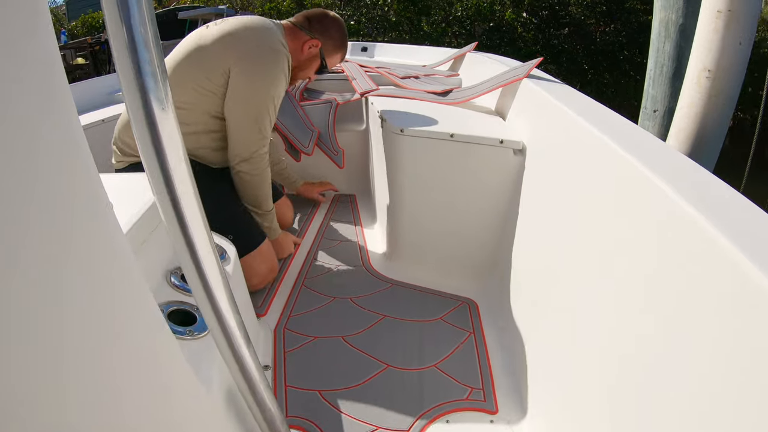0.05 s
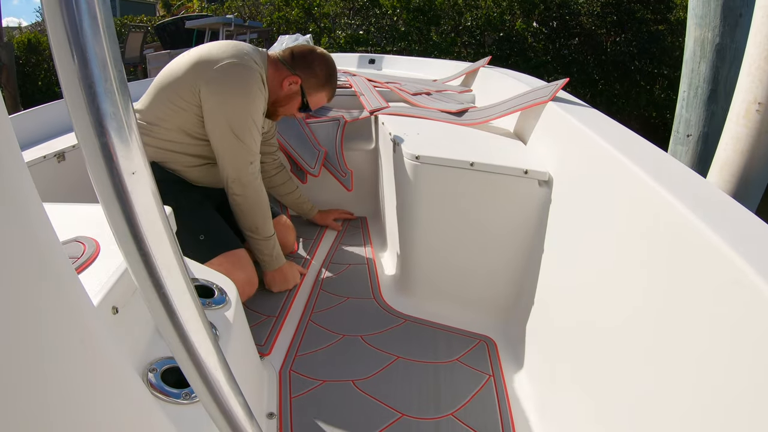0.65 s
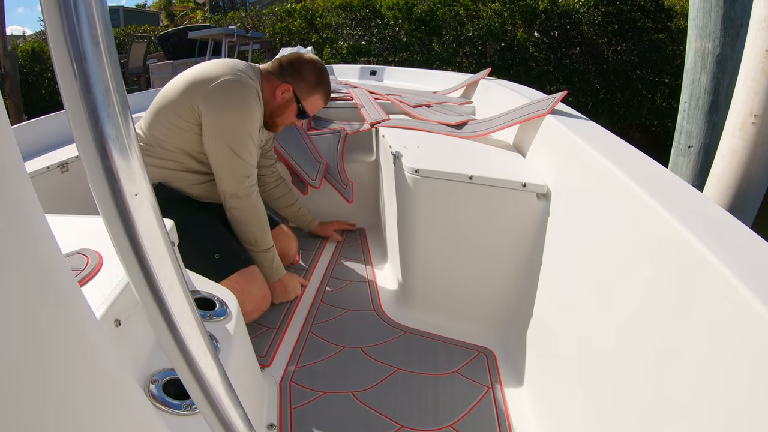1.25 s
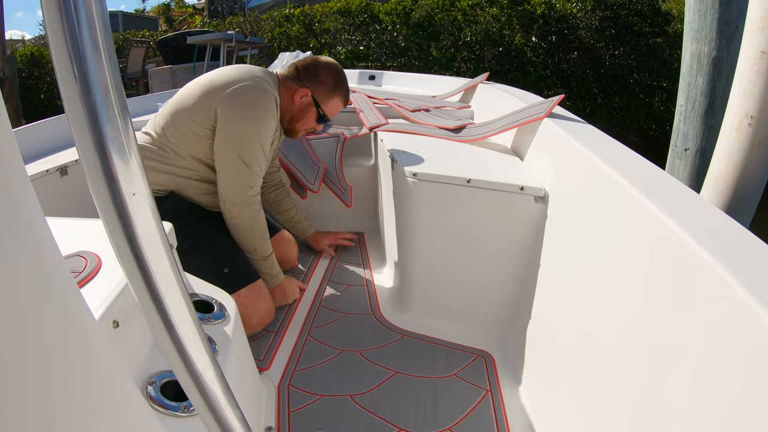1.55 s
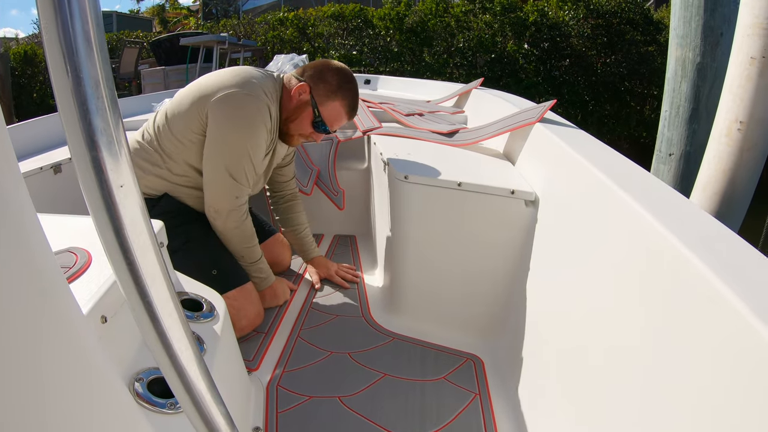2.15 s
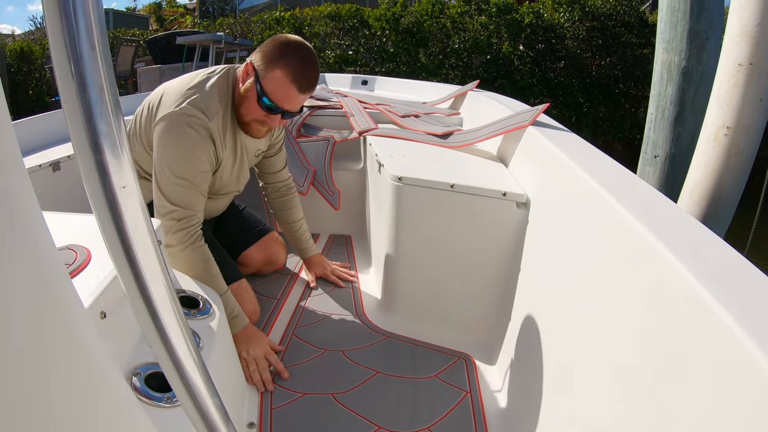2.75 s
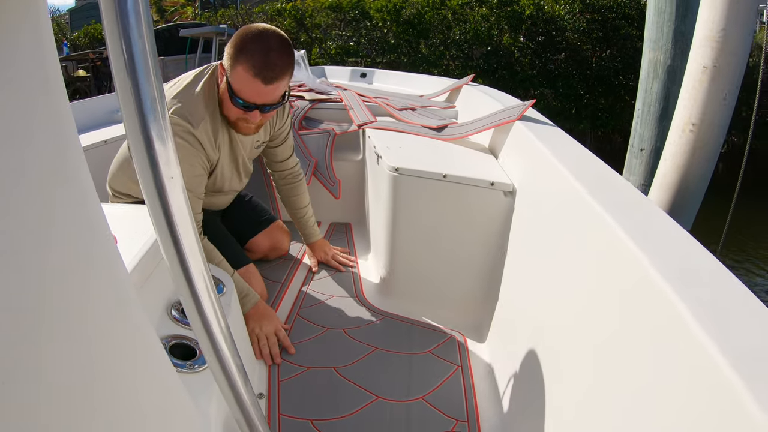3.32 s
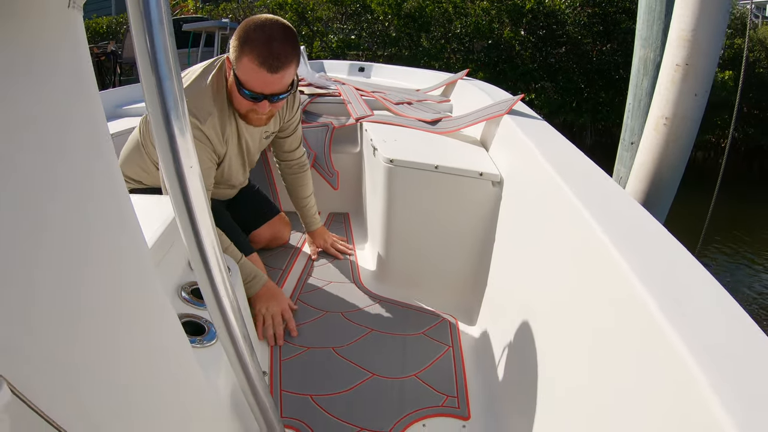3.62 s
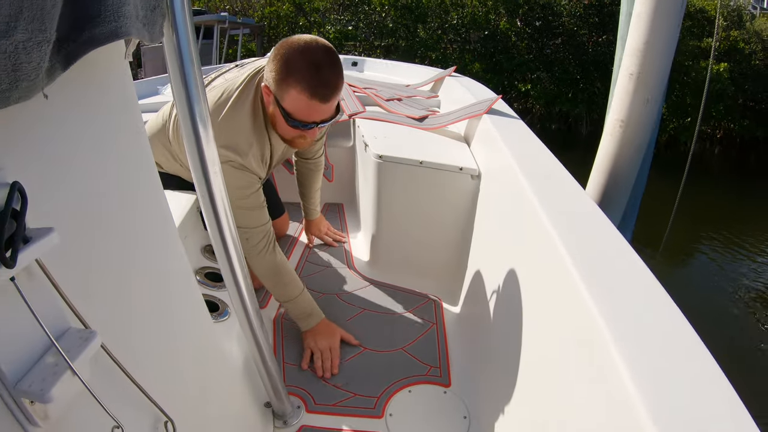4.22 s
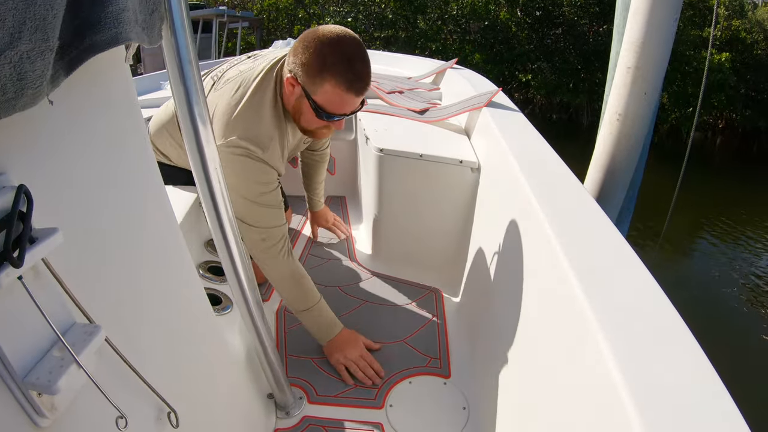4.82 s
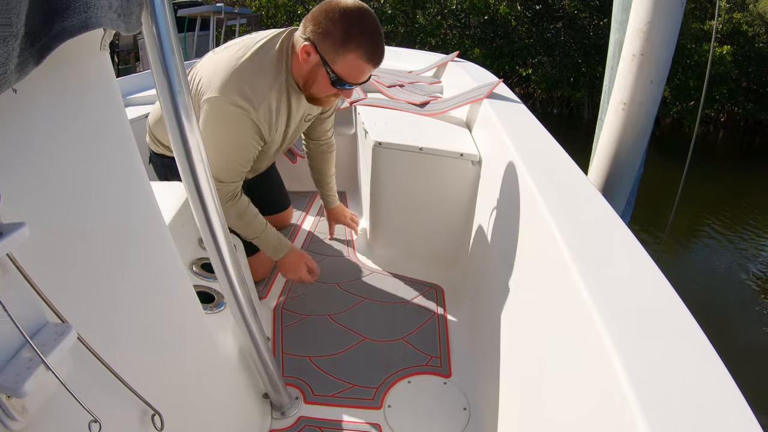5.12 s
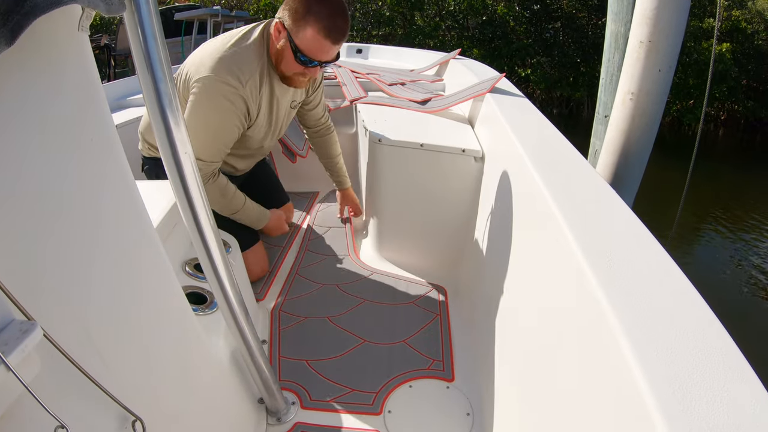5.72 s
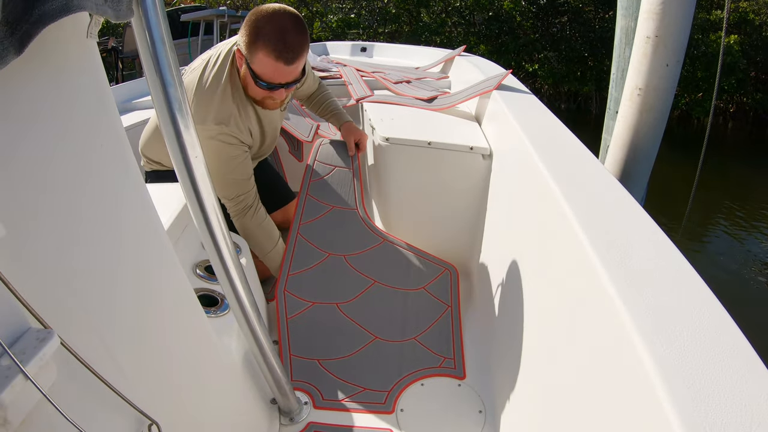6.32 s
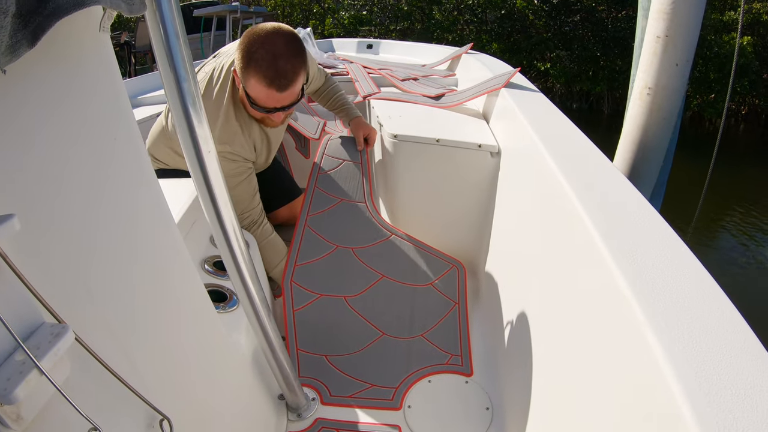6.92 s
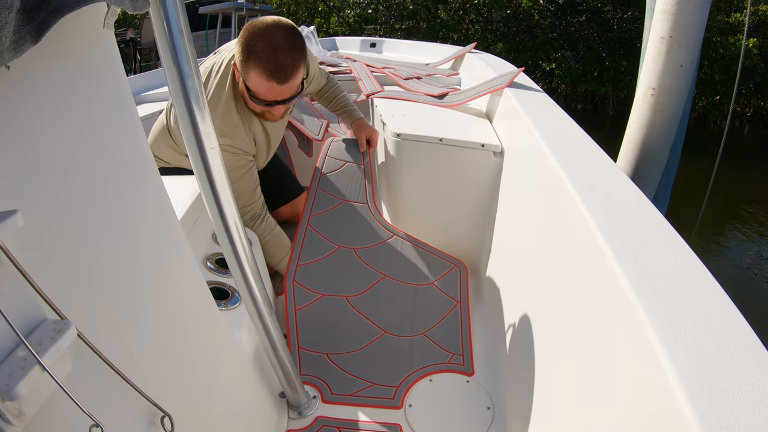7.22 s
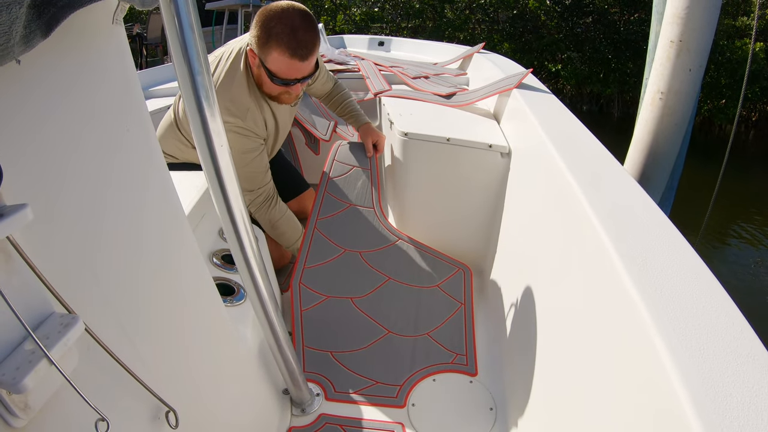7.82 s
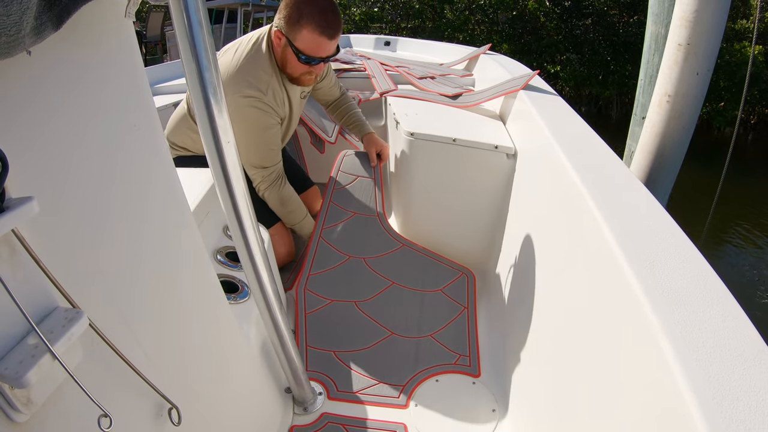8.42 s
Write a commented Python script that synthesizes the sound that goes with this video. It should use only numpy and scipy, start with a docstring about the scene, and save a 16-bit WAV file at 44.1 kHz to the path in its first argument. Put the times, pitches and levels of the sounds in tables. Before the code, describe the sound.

Outdoors in a boat's cockpit, knees and hands knock on a hollow deck and sleeves brush a foam mat. Hands rub the foam in two raspy strokes. Then the mat scrapes along in shoves, its backing paper crackling with a sharp cluster of snaps before a steady papery slide. Low rumble and soft thuds come from the hand-held microphone, with a faint outdoor wash and hum behind.

```python
"""Soft bumps, knocks and light brushing, then palms hissing and rasping over a foam deck pad on a moored boat.
The pad is shoved and slid: its edge scrapes, its stiff paper backing hisses, folds and snaps.
Rubbing is a stream of tiny slips; a snap is a burst of creases that rings the pad and the hollow deck.
Knees and hands knock on the deck, and all the work echoes in the hard-walled cockpit.
A hand-held camera adds the bumps and a low rumble, over open air and a faint hum."""
import sys
import numpy as np
from scipy import signal
from scipy.fft import rfft, irfft
from scipy.io import wavfile
from scipy.ndimage import uniform_filter1d

SR = 44100
rng = np.random.default_rng(int(sys.argv[2]) if len(sys.argv) > 2 else 0)


def digitize_waveform(pressure):
    """Quantize a signal to 16-bit integers and store it at the path in sys.argv[1].

    Rows of a 2-D input are taken as channels; values are limited to [-1, 1].
    """
    field = np.atleast_2d(pressure).T
    bounded = np.clip(field, -1, 1)
    quanta = np.round(bounded * 32767).astype(np.int16)
    wavfile.write(sys.argv[1], SR, quanta)


N = 381906

# palm sweeps: start_s, length_s, skin_db, grit_db
PALM_SWEEPS = [(3.869, 0.7618, -48, -52), (4.836, 0.298, -53.3, -60.5)]
# palm bearing down: centre_s, half_width_s, relative_force
PALM_PUSHES = [(4.07, 0.057, 0.4), (4.365, 0.125, 1), (5.08, 0.055, 1.3)]
# skin hiss: freq_hz, density_db
SKIN_SPECTRUM = [(400, -20), (3500, -14), (5000, -10), (6500, -1.5), (8000, -2.5), (9500, -1.5),
                 (12000, -5), (15800, -9)]
# grit of pressed foam: freq_hz, density_db
GRIT_SPECTRUM = [(300, -17), (600, -6), (850, 2.5), (1300, -2), (2700, 0), (3400, 1), (4600, -1.5),
                 (5700, -1), (8000, -8), (12000, -15), (15800, -22)]
# rasping strokes, one curve each: time_s, centre_hz, level_db
RASP_STROKES = [
    [(3.87, 1700, -68), (3.905, 1700, -58), (3.97, 1200, -64), (4.05, 980, -52.5), (4.19, 1800, -61),
     (4.29, 1600, -47), (4.38, 2000, -44), (4.49, 1600, -53), (4.63, 1200, -52), (4.69, 1000, -70)],
    [(4.84, 850, -67), (4.92, 930, -53.5), (5.005, 1250, -55), (5.045, 1850, -45.5), (5.095, 2300, -47),
     (5.13, 3700, -53), (5.155, 4200, -68)],
    [(8.46, 1200, -64), (8.55, 1300, -50.5), (8.66, 1400, -49.5)],
]
# rasp resonance: ratio_to_centre, gain_db
RASP_RESONANCE = [(.15, -40), (.42, -20), (.7, -3), (1, 0), (1.3, -2.5), (1.9, -15), (4, -32), (10, -50)]
# foam groans and squeaks: start_s, length_s, pitch_hz, level_db
FOAM_GROANS = [(3.885, 0.126, 114.7, -48), (5.077, 0.027, 265, -53), (6.465, 0.0436, 105, -54.5),
               (8.136, 0.1, 432, -55), (0.963, 0.04, 5360, -59), (5.08, 0.075, 1560, -53)]
# sleeve and finger touches: peak_s, level_db, fade_s
TOUCHES = [(0.054, -57.5, 0.11), (0.212, -53.5, 0.0477), (0.43, -60.5, 0.114), (0.755, -62.5, 0.049),
           (0.985, -51.5, 0.0164), (1.16, -63, 0.067), (1.53, -58.5, 0.068), (2.128, -55, 0.0108),
           (2.53, -53, 0.183), (3.777, -51, 0.044), (5.35, -58.5, 0.065), (5.804, -59, 0.0253)]
# light brushing: freq_hz, density_db
BRUSH_SPECTRUM = [(500, -5.5), (2000, 1), (4000, 0), (6200, 1), (9500, -2), (12500, -9), (15800, -13.5)]

# shoves of the pad: start_s, length_s, paper_db, scrape_db, bass_db
PAD_SHOVES = [(5.3, 0.11, -73.5, -80, -56), (5.66, 0.083, -60.5, -57.5, -59),
              (5.9, 0.336, -61, -76.5, -67.5), (6.245, 0.1, -67, -48.5, -52),
              (6.32, 0.1983, -56.5, -54, -57), (6.44, 0.09, -70, -53.5, -60), (6.53, 0.192, -57, -71, -59),
              (6.65, 0.246, -60, -57.5, -57.5), (6.9, 0.157, -72, -54.5, -64),
              (7.13, 0.11, -60, -68.5, -57)]
# long slide of the backing: time_s, level_db
SLIDE_LEVELS = [(7.05, -64), (7.15, -55.5), (7.4, -54), (7.62, -54.3), (8.04, -51), (8.28, -51.3),
                (8.53, -53), (8.66, -50.5)]
# hollow colour of the sliding backing: ratio_to_ridge, gain_db
SLIDE_RIPPLE = [(.44, 0), (.51, -2), (.59, 1.5), (.64, -.5), (.7, 1.5), (.77, -1.5), (.92, -1), (1, 3),
                (1.05, -1.5), (1.1, 1.5), (1.2, -.5)]
# climb of its main ridge: time_s, ridge_hz
RIDGE_PATH = [(7.1, 8900), (7.85, 9400), (8.15, 10050), (8.66, 10550)]
# paper hiss: freq_hz, density_db
PAPER_SPECTRUM = [(150, -6), (400, -0.5), (600, -3), (900, -6), (1300, 0), (1850, 1.5), (2700, 1.5),
                  (4300, -0.5), (6200, -0.5), (7500, -4.5), (9200, -4.5), (12500, -11), (15800, -14)]
# edge scrape: freq_hz, density_db
SCRAPE_SPECTRUM = [(150, -7), (400, -8.5), (580, -3), (850, 2), (1400, 2), (2000, -3), (3500, -9.5),
                   (8000, -15), (15800, -35)]
# deck bass under the dragged pad: freq_hz, density_db
BASS_SPECTRUM = [(50, -12.5), (110, 6.5), (220, 8.5), (400, 1.5), (700, -1.5), (1500, -88), (5000, -90)]

# snaps of the backing: start_s, fold_db, low_hz, high_hz, rise_s, decay_s, crack_db
BACKING_SNAPS = [ (0.921, -36, 400, 1730, .0009, 0.00243, -62),
                 (1.0731, -38, 2400, 2300, 0.00075, 0.00405, -53.5),
                 (1.1414, -33.5, 2400, 2400, 0.00065, 0.0041, -44),
                 (3.104, -42, 700, 3600, 0.00048, 0.00232, -56),
                 (5.503, -41.5, 800, 5000, 0.003, 0.00334, -43.5),
                 (5.718, -39.5, 700, 1850, .006, 0.0174, -74),
                 (5.8977, -37, 300, 3480, 0.00043, 0.00164, -50),
                 (5.9655, -41, 700, 1000, 0.00073, 0.0051, -66),
                 (6.185, -43, 300, 1700, 0.0147, 0.0059, -51.5),
                 (6.341, -35, 250, 890, 0.0011, 0.0024, -66),
                 (6.598, -39.5, 600, 2200, 0.00157, 0.0032, -64),
                 (6.6655, -35, 1500, 5000, .002, 0.004, -37), (6.671, -25.5, 700, 2700, .002, 0.0035, -42),
                 (6.690, -29, 700, 2300, 0.0059, 0.0084, -62),
                 (6.7552, -20, 553, 3840, 0.00137, 0.00766, -12),
                 (6.808, -26.5, 450, 3560, 0.0088, 0.0055, -22.5),
                 (6.835, -35, 450, 2580, 0.0013, 0.012, -62), (6.863, -43, 2000, 3600, 0.001, 0.004, -60),
                 (6.921, -35.5, 398, 5600, 0.0009, 0.0081, -42),
                 (6.996, -32, 700, 2200, 0.00168, 0.0078, -60), (7.006, -28, 1200, 2300, 0.002, 0.004, -60),
                 (7.038, -45, 2500, 5000, 0.002, 0.004, -62),
                 (7.199, -39.5, 450, 3930, 0.011, 0.008, -61.5),
                 (7.406, -39.5, 250, 3820, 0.0052, 0.0123, -48)]
# modes of the backed pad: freq_hz, lift_db, t60_s
PAD_MODES = [(343, 11.5, 0.048), (564, 3, 0.06), (695, -2, 0.06), (845, 6, 0.04), (1000, 2.5, 0.042),
             (1134, -4, 0.05), (1279, 0.5, 0.0194), (1810, 7.5, 0.036), (2270, 0, 0.046), (2800, 1, 0.0275),
             (3320, -2, 0.039), (3898, 4, 0.05), (4870, 3, 0.04), (5330, 1.5, 0.028), (5920, 8, 0.0112),
             (8850, 8, 0.0062)]
# knocks on the deck: start_s, peak_db, pitch_hz
DECK_KNOCKS = [(0.067, -25.5, 146), (0.92, -24, 142), (0.926, -33, 253.3), (5.623, -26.5, 342),
               (5.644, -29.5, 241.8), (5.969, -35, 330), (6.342, -33.5, 290), (6.76, -35, 344),
               (6.815, -39, 280), (7.002, -36, 311)]
# deck panel modes: ratio_to_pitch, level_db, t60_s
DECK_MODES = [(.62, -4, 0.0378), (1, 4.5, 0.0274), (1.45, -5.5, 0.068), (1.9, -11, 0.074),
              (2.5, -19.5, 0.115)]
# cockpit echo decay: freq_hz, t60_s
COCKPIT_DECAY = [(150, 0.369), (700, 0.142), (2000, 0.114), (5000, 0.0887), (15000, 0.093)]

# bumps on the camera: start_s, level_db
CAMERA_BUMPS = [(0.05, -37), (0.068, -30), (0.206, -33), (0.246, -36.5), (0.424, -34.5), (0.876, -38),
                (3.093, -29.5), (3.184, -45), (3.401, -32.5), (3.574, -39), (3.815, -32), (4.024, -32.5),
                (4.066, -35.5), (4.191, -32.5), (4.50, -33.5), (4.545, -27.5), (4.579, -34.5), (4.617, -31),
                (4.857, -40), (5.149, -32.5), (5.508, -30)]
# camera moves: start_s, length_s, level_db
CAMERA_MOVES = [(0.0, 0.47, -37.5), (0.6, 0.292, -44), (1.25, 0.133, -46.5), (3.05, 0.48, -39.5),
                (3.95, 0.338, -38.5), (4.42, 0.144, -34.5), (4.72, .8, -46), (5.65, 0.38, -45)]
# handling rumble: freq_hz, density_db
RUMBLE_SPECTRUM = [(2, 3), (5, 13.5), (11, 4.5), (17, 1.5), (24, -5.5), (33, -24.5), (50, -12.5),
                   (80, -25.5), (150, -44.5), (300, -43.5), (700, -69)]
# open air: freq_hz, density_db
AIR_SPECTRUM = [(20, -22.5), (40, -3.5), (70, 0.5), (100, -6), (150, -5), (200, -7.5), (310, -10),
                (450, -8.5), (580, -11.5), (800, -12), (1300, -13), (2500, -17), (4500, -24.5),
                (15800, -35)]
# mains hum: freq_hz, rms_db
MAINS_HUM = [(60, -66.5), (120, -72.5)]

SHOVE_ATTACK_S, SHOVE_RELEASE_S = 0.0222, 0.0313


def palm_sweeps(push_skin_db=3, push_grit_db=8):
    """The palm hisses over the foam grain, louder and grittier where it presses."""
    t = np.arange(N) / SR
    force = sum(strength * np.exp(-np.minimum(((t - s) / half_width_s) ** 2, 20))
                for s, half_width_s, strength in PALM_PUSHES)
    skin_gain, grit_gain = 0, 0
    for s, length_s, skin_db, grit_db in PALM_SWEEPS:
        touch = contact(t - s, length_s, attack_s=0.032, release_s=0.042 * length_s)
        skin_gain += touch * gain_of(skin_db + push_skin_db * force)
        grit_gain += touch * gain_of(grit_db + push_grit_db * force)
    fine = friction(slips_per_s=7700, spread_db=1, smooth=2.55, judder_db=0.6, judder_hz=45)
    coarse = friction(slips_per_s=2500, spread_db=2, smooth=0.8, judder_db=1, judder_hz=46)
    skin = skin_gain * coloured(fine, SKIN_SPECTRUM, (6000, 15000))
    grit = grit_gain * coloured(shifting(coarse, patch_db=2.6), GRIT_SPECTRUM, (700, 5000))
    return gain_of(-1) * skin + grit


def foam_rasp():
    """Rubbed foam rasps in a broad resonance that glides with the speed of the stroke."""
    slips = friction(slips_per_s=3000, spread_db=1.5, smooth=1, judder_db=0.8, judder_hz=50)
    slips = evened(shifting(slips, patch_db=3, patch_bins=4))
    path = [(s, hz) for stroke in RASP_STROKES for s, hz, _ in stroke]
    envelope = sum(level([(s, db) for s, _, db in stroke]) for stroke in RASP_STROKES)
    return envelope * gliding(slips, RASP_RESONANCE, path)


def paper_slide():
    """The backing hisses over the deck in short shoves and one long slide whose hollow colour rises."""
    motion = np.hypot(movements(PAD_SHOVES, SHOVE_ATTACK_S, SHOVE_RELEASE_S), level(SLIDE_LEVELS))
    slips = friction(slips_per_s=3500, spread_db=2.5, smooth=1.48, judder_db=0.65, judder_hz=25)
    hiss = gliding(slips, SLIDE_RIPPLE, RIDGE_PATH)
    return motion * coloured(hiss, PAPER_SPECTRUM, (4500, 15000))


def edge_drag():
    """The pad's edge scrapes in coarse slips; weight on it brings out the deck's bass."""
    shoves = movements(PAD_SHOVES, SHOVE_ATTACK_S, SHOVE_RELEASE_S, column=3)
    weight = movements(PAD_SHOVES, SHOVE_ATTACK_S, SHOVE_RELEASE_S, column=4)
    motion = np.hypot(shoves, gain_of(-10) * level(SLIDE_LEVELS))
    slips = friction(slips_per_s=2500, spread_db=2, smooth=1.88, judder_db=3.85, judder_hz=29.8)
    slips = shifting(slips, patch_db=0.73)
    scrape = motion * coloured(slips, SCRAPE_SPECTRUM, (400, 2000))
    bass = weight * coloured(slips, BASS_SPECTRUM, (80, 600))
    return gain_of(-1) * scrape + bass


def backing_snaps(lag_s=0.002, crack_rise_s=0.00107, crack_decay_s=0.00275, fizz_low_hz=9000):
    """The backing folds, then gives way with a fizz of paper fibres; the loudest crack is bright."""
    out, t = np.zeros(N), np.arange(SR // 20) / SR
    loudest_db = max(row[-1] for row in BACKING_SNAPS)
    fibres = contact(t, crack_rise_s, crack_rise_s, release_s=0.004)
    highpass = signal.butter(2, fizz_low_hz, "high", fs=SR)
    for s, fold_db, low_hz, high_hz, rise_s, decay_s, crack_db in BACKING_SNAPS:
        add(out, s, gain_of(fold_db) * buckle(low_hz, high_hz, rise_s, decay_s))
        weaker_db = loudest_db - crack_db
        top_hz = 4900 * 2 ** (-2.9 * weaker_db)  # weaker cracks shrink to a faint low thump
        fizz = signal.lfilter(*highpass, fibres * rng.standard_normal(len(t)))
        add(out, s + lag_s, gain_of(crack_db) * buckle(3800, top_hz, crack_rise_s, crack_decay_s))
        add(out, s + lag_s, gain_of(-36.5 - 0.58 * weaker_db) * fizz)
    return out


def buckle(low_hz, high_hz, rise_s, decay_s):
    """A filtered burst of creases rings the pad, bent a little differently each time, and the deck."""
    t = np.arange(SR // 6) / SR
    swell = contact(t, rise_s, rise_s, decay_s, max_decay=np.inf)
    burst = signal.lfilter(*signal.butter(1, low_hz, "high", fs=SR), flat_burst(swell))
    burst = signal.lfilter(*signal.butter(3, high_hz, fs=SR), burst)
    bend = 1 + 0.015 * rng.uniform(-1, 1)
    burst = burst + sum(gain_of(lift_db) * resonate(burst, bend * hz, np.log(1000) / np.pi / t60_s)
                        for hz, lift_db, t60_s in PAD_MODES)
    return hollow_deck(burst) * np.linalg.norm(swell) / np.linalg.norm(burst)


def hollow_deck(x, t60_s=0.083, rise_s=0.009, band_hz=(500, 1400)):
    """The hollow deck booms briefly, differently at each spot of the pad."""
    t = np.arange(SR // 6) / SR
    ring = flat_burst(gain_of(-60 * t / t60_s) * np.minimum(t / rise_s, 1))
    ring = signal.lfilter(*signal.butter(2, band_hz, "band", fs=SR), ring / np.linalg.norm(ring))
    return x + gain_of(-8) * signal.fftconvolve(x, ring)[:len(x)]


def deck_knocks():
    """Knees and hands land on the deck, whose damped panels ring briefly."""
    out, t = np.zeros(N), np.arange(SR // 4) / SR
    for s, peak_db, hz in DECK_KNOCKS:
        ring = sum((-1) ** k * gain_of(db - 60 * t / t60_s) * np.sin(2 * np.pi * hz * ratio * t)
                   for k, (ratio, db, t60_s) in enumerate(DECK_MODES))
        add(out, s, gain_of(peak_db) * ring / abs(ring).max())
    return out


def foam_groans(width_share=0.174):
    """Foam sticks and slips at a rough pitch."""
    out = np.zeros(N)
    for s, length_s, hz, db in FOAM_GROANS:
        slips = rng.standard_normal(int(length_s * SR))
        tone = resonate(resonate(slips, hz, width_share * hz), hz, width_share * hz)
        add(out, s, gain_of(db) * evened(tone * signal.windows.tukey(len(slips), 0.5)))
    return out


def brushing(rise_share=0.647):
    """Sleeves and fingertips graze the pad; each touch swells and fades."""
    t, touch = np.arange(N) / SR, 0
    for s, db, fade_s in TOUCHES:
        age = (t - s) / fade_s
        touch += gain_of(db) * np.exp(-np.where(age < 0, (age / rise_share) ** 2, age))
    slips = friction(slips_per_s=2300, spread_db=4, smooth=7.2, judder_db=1.42, judder_hz=30)
    return gain_of(-1) * touch * coloured(slips, BRUSH_SPECTRUM, (4500, 15000))


def cockpit(x, wet_db, echoes_per_s=3000, gap_s=0.004):
    """Close walls add a short tail of echoes that lasts longest in the bass."""
    t = np.arange(SR // 3) / SR
    taps = rng.choice([-1., 1.], len(t)) * (rng.random(len(t)) < echoes_per_s / SR) * (t > gap_s)
    hz, frame_s, spectra = signal.stft(taps, SR, nperseg=256)
    decay = gain_of(-60 * frame_s / read(COCKPIT_DECAY, hz)[:, None])
    tail = signal.istft(spectra * decay, SR, nperseg=256)[1]
    return x + signal.fftconvolve(x, gain_of(wet_db) * tail / np.linalg.norm(tail))[:N]


def camera_handling(shell_hz=145, shell_t60_s=0.024, mount_hz=24, mount_t60_s=0.88):
    """The held camera rumbles, more when moved; each bump thuds its shell and wobbles its mount."""
    motion = np.hypot(gain_of(-49.5), movements(CAMERA_MOVES, attack_s=0.0385, release_s=0.217))
    out = gain_of(-2) * motion * coloured(rng.standard_normal(N), RUMBLE_SPECTRUM, (18, 50))
    t = np.arange(SR // 2) / SR
    for (s, db), detune in zip(CAMERA_BUMPS, rng.uniform(1, 1.2065, len(CAMERA_BUMPS))):
        thud = np.sin(2 * np.pi * shell_hz * detune * t) * gain_of(-60 * t / shell_t60_s)
        thud *= 1 - np.exp(-t / 0.00033)
        wobble = np.sin(2 * np.pi * mount_hz * detune * t) * gain_of(-2 - 60 * t / mount_t60_s)
        shudder = evened(resonate(resonate(rng.standard_normal(len(t)), 30.6, 156), 30.6, 156))
        shudder *= gain_of(-4.5 - 60 * t / 0.239) * np.minimum(t / 0.0075, 1)
        add(out, s, gain_of(db) * (thud / abs(thud).max() + wobble + shudder))
    return out


def open_air(wash_db=-55):
    """Distant outdoor wash with a faint mains hum."""
    t = np.arange(N) / SR
    wash = coloured(rng.standard_normal(N), AIR_SPECTRUM, (300, 15000))
    hum = sum(gain_of(db) * np.sqrt(2) * np.sin(2 * np.pi * hz * t) for hz, db in MAINS_HUM)
    return gain_of(wash_db) * wash + hum


def friction(slips_per_s, spread_db, smooth, judder_db, judder_hz):
    """Tiny slips of uneven size over a smooth hiss; the contact pressure judders."""
    slips = rng.standard_normal(N) * gain_of(spread_db * np.minimum(rng.exponential(1, N), 5))
    slips *= rng.random(N) < slips_per_s / SR
    rolloff = 1 + (np.fft.rfftfreq(N, 1 / SR) / judder_hz) ** 4
    judder = evened(irfft(rfft(rng.standard_normal(N)) / rolloff, N))
    return (evened(slips) + smooth * rng.standard_normal(N)) * gain_of(judder_db * judder)


def shifting(x, patch_db, patch_frames=24, patch_bins=7):
    """The contact patch changes as it moves, so small resonances come and go."""
    spectra = signal.stft(x, nperseg=1024, noverlap=768)[2]
    patches = uniform_filter1d(rng.standard_normal(spectra.shape), patch_frames, axis=1)
    patches = evened(uniform_filter1d(patches, patch_bins, axis=0))
    return signal.istft(spectra * gain_of(patch_db * patches), nperseg=1024, noverlap=768)[1][:N]


def gliding(x, shape, path):
    """Colours x with a unit-power shape that follows a path of time_s, centre_hz."""
    hz, frame_s, spectra = signal.stft(x, SR, nperseg=512, noverlap=384)
    centre_hz = np.interp(frame_s, *np.transpose(path))
    gain = gain_of(read(shape, hz[:, None] / centre_hz))
    gain /= np.sqrt(np.mean(gain ** 2, axis=0))
    return signal.istft(spectra * gain, nperseg=512, noverlap=384)[1][:N]


def coloured(x, spectrum, band_hz):
    """Gives x a spectrum, at rms 1 inside the band."""
    hz = np.fft.rfftfreq(N, 1 / SR)
    shaped = rfft(x) * gain_of(read(spectrum, hz))
    in_band = (hz > band_hz[0]) & (hz < band_hz[1])
    return irfft(shaped, N) / np.std(irfft(shaped * in_band, N))


def flat_burst(swell):
    """Noise under an envelope, its spectrum flattened."""
    pad = len(swell) // 2
    spectrum = rfft(np.pad(rng.standard_normal(len(swell)) * swell, pad))
    power = abs(uniform_filter1d(abs(spectrum) ** 2, size=160))
    return irfft(spectrum / np.sqrt(power + 1e-9))[pad:][:len(swell)]


def resonate(x, hz, width_hz):
    """One band-pass resonance."""
    carrier = np.exp(2j * np.pi * np.cumsum(hz * np.ones(len(x))) / SR)
    pole = np.exp(-np.pi * width_hz / SR)
    return 2 * (carrier * signal.lfilter([1 - pole], [1, -pole], x / carrier)).real


def contact(t, length_s, attack_s, release_s, max_decay=20):
    """Envelope from t = 0: builds up, holds, dies away."""
    return np.clip(t / attack_s, 0, 1) * np.exp(-np.clip((t - length_s) / release_s, 0, max_decay))


def movements(rows, attack_s, release_s, column=2):
    """Gain over time from one dB column of a table of movements; powers add."""
    t = np.arange(N) / SR
    coarse_s = t[::64]
    power = sum((gain_of(row[column]) * contact(coarse_s - row[0], row[1], attack_s, release_s)) ** 2
                for row in rows)
    return np.interp(t, coarse_s, np.sqrt(power))


def level(rows, release_s=0.03):
    """Gain over time from a dB curve: silent before it, dying away after it."""
    t = np.arange(N) / SR
    times_s, db = np.transpose(rows)
    release = np.exp(-np.clip((t - times_s[-1]) / release_s, 0, 20))
    return gain_of(np.interp(t, times_s, db)) * (t >= times_s[0]) * release


def read(points, x):
    """Interpolates a curve on a log(1 + x) axis."""
    knots, values = np.transpose(points)
    return np.interp(np.log(x + 1), np.log(knots + 1), values)


def add(mix, start_s, sound):
    """Mixes a sound in at start_s."""
    part = mix[round(start_s * SR):][:len(sound)]
    part += sound[:len(part)]


def gain_of(db):
    """Decibels to a factor."""
    return 10 ** (np.asarray(db) / 20)


def evened(x):
    """Scales to rms 1."""
    return x / np.sqrt(np.mean(x ** 2) + 1e-20)


def scene():
    """Work on the pad echoes in the cockpit; air and handling stay dry."""
    rubbing = brushing() + palm_sweeps() + foam_rasp() + paper_slide() + edge_drag() + foam_groans()
    rubbing = cockpit(rubbing, wet_db=-13)
    blows = cockpit(backing_snaps() + deck_knocks(), wet_db=-11.5)
    return (rubbing + blows + open_air() + camera_handling())[None]


def record(dry):
    """Low-pass at 15.9 kHz."""
    lowpass = signal.firwin(511, 15900, window=("kaiser", 9), fs=SR)
    return signal.oaconvolve(dry, lowpass[None], "same")


dry = scene()
out = record(dry)
digitize_waveform(out)
```